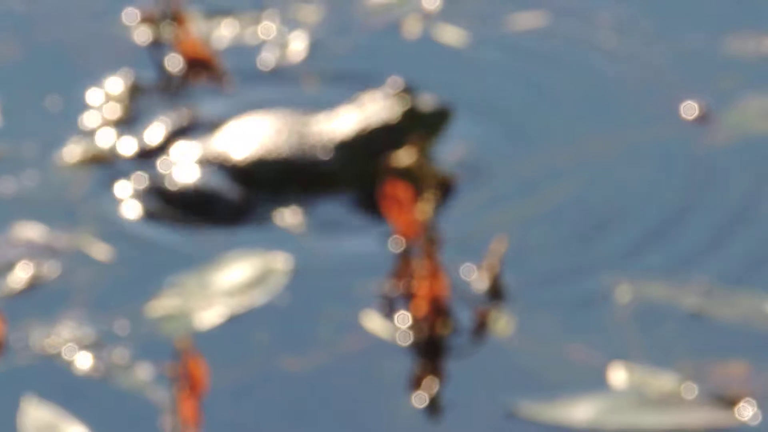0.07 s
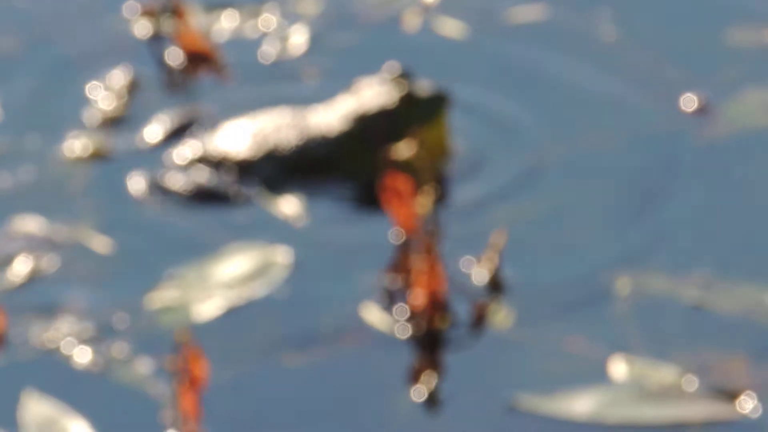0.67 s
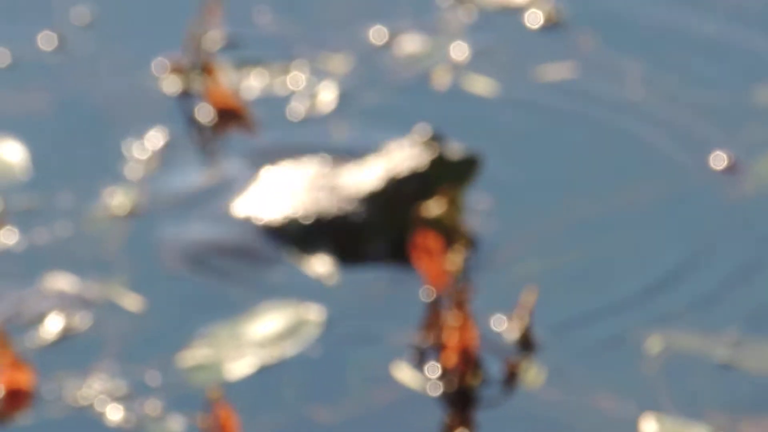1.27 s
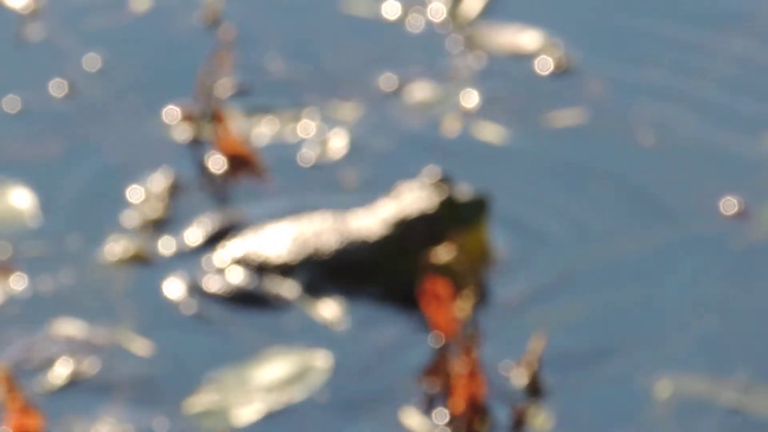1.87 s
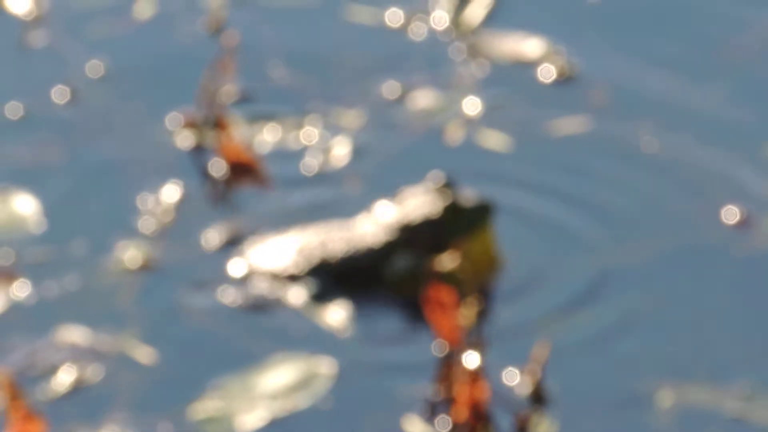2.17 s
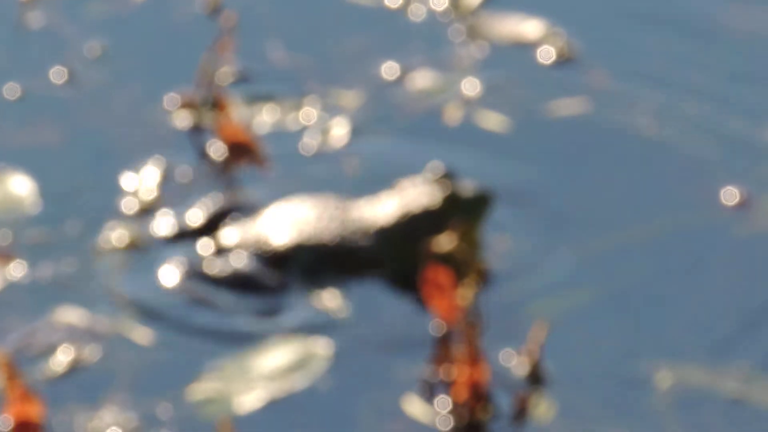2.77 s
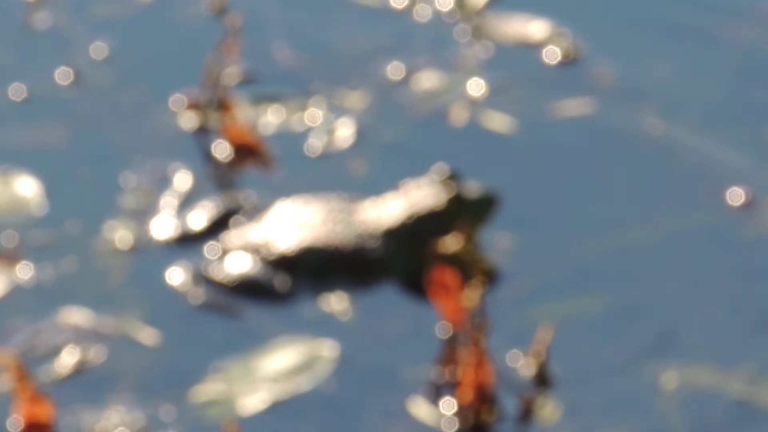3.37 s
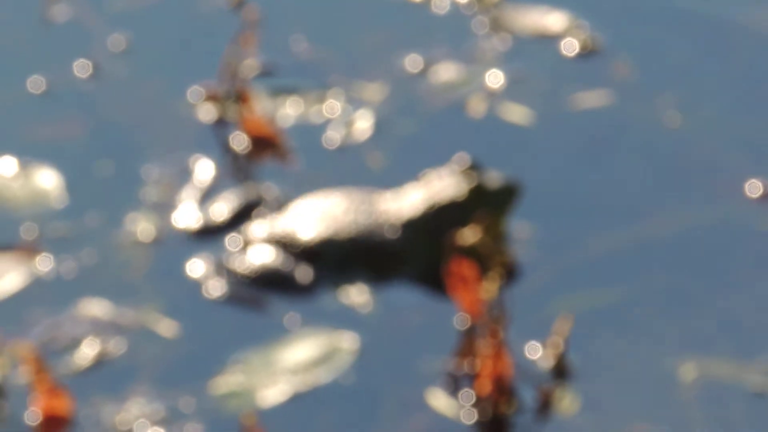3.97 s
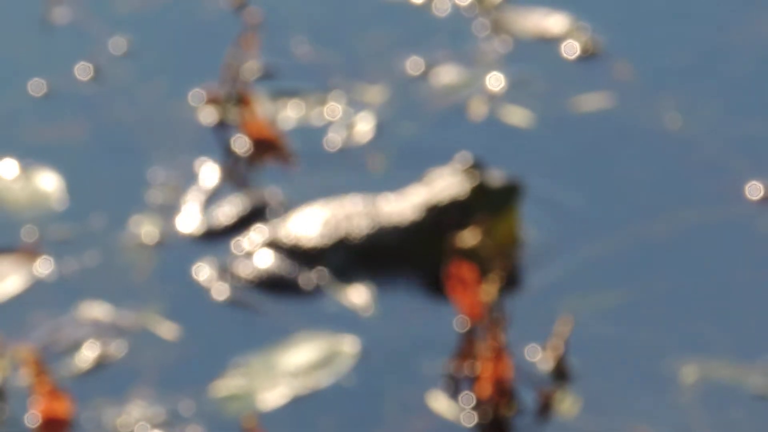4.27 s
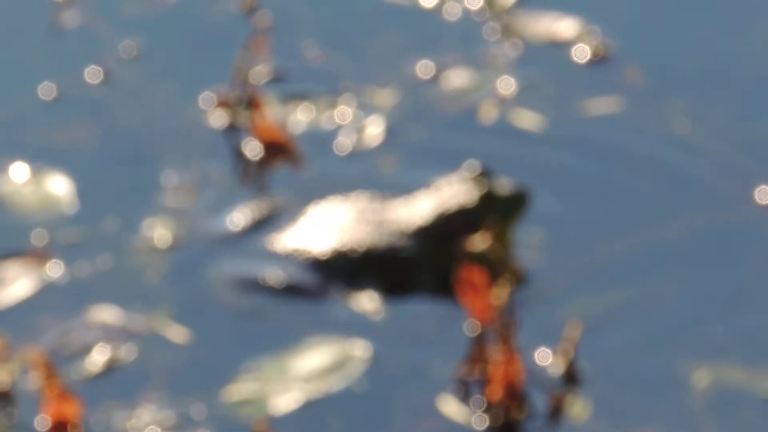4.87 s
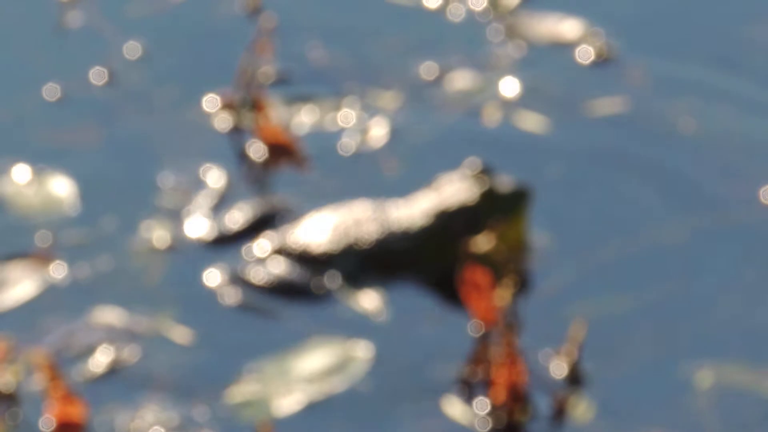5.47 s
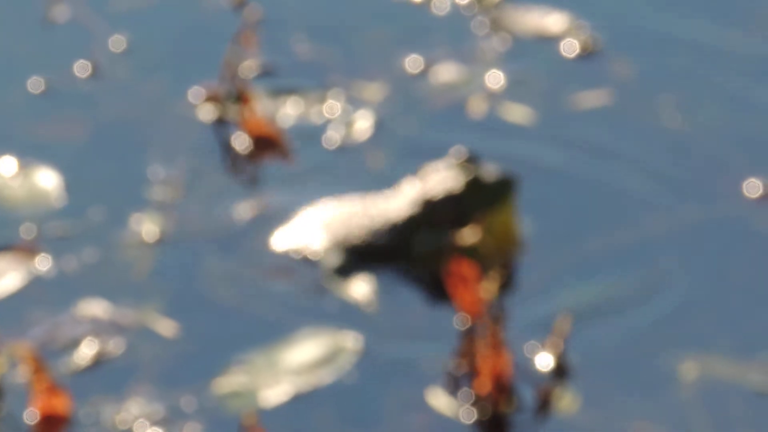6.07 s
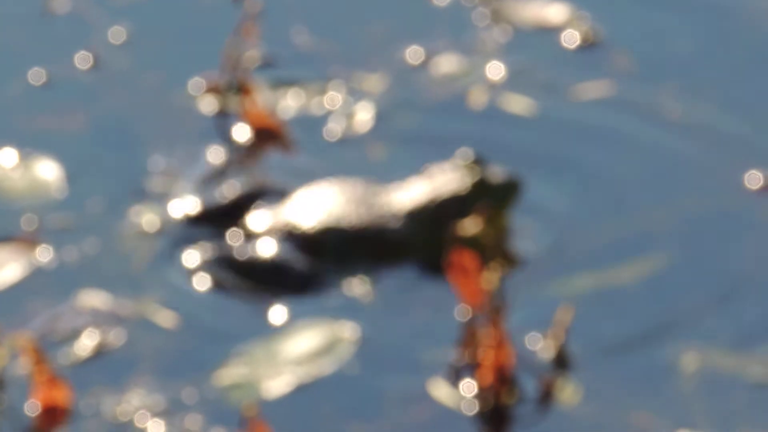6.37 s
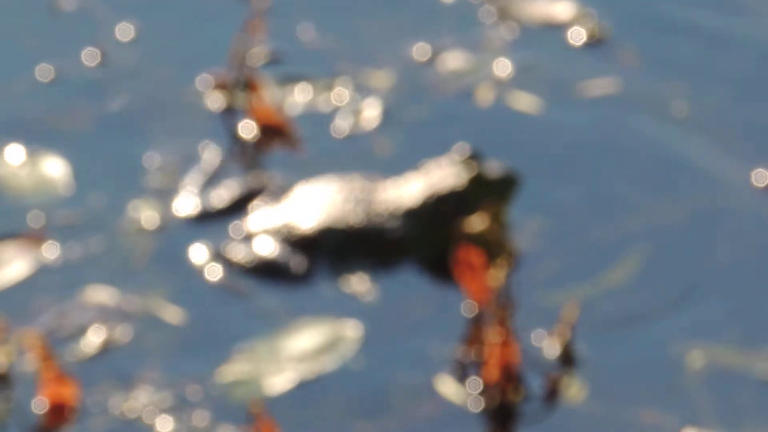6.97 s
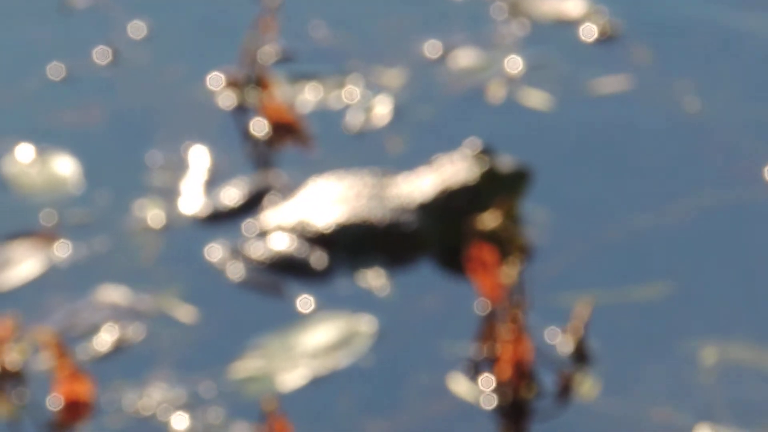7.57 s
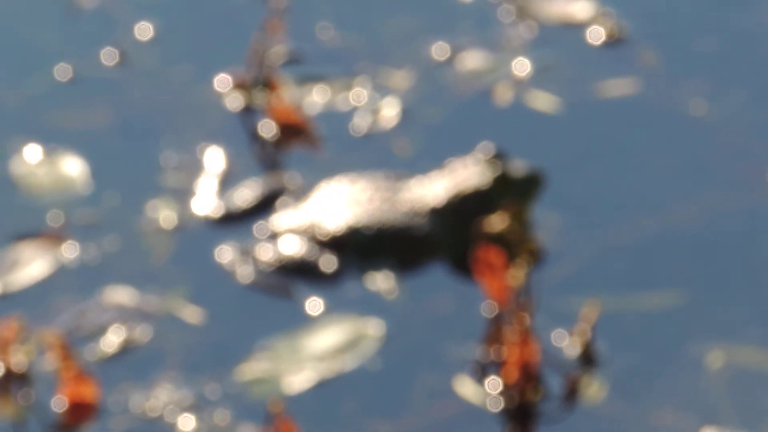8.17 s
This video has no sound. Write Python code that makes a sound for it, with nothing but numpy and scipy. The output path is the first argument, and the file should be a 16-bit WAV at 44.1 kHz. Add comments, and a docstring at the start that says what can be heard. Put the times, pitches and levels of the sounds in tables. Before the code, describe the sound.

A nearby bullfrog gives four low, pulsing, buzzy croaks over a distant drone of other frogs and a light breeze on the microphone.

```python
"""Far bullfrogs drone round a pond; a breeze rumbles on the microphone ports over a thin hiss.
At 0.3 s and 1.7 s a near bullfrog croaks: swells that each end in a catch, then a drawn-out drone.
Its vocal cords snap about 115 times a second, booming in the throat sac and buzzing through the
eardrums; the banks echo it. Eddies buffet the ports around 3 s. It croaks again at 4.2 s and 5.4 s,
then gusts pass and the far chorus surges."""
import sys
import numpy as np
from scipy import signal
from scipy.fft import rfft, irfft, next_fast_len
from scipy.io import wavfile
from scipy.ndimage import uniform_filter1d

SR = 44100
rng = np.random.default_rng(int(sys.argv[2]) if len(sys.argv) > 2 else 0)


def generate_wav(sig):
    """Save sig (samples, or channels by samples) to the path in sys.argv[1] as 16-bit PCM at SR."""
    pcm = np.round(np.clip(np.atleast_2d(sig).T, -1, 1) * 32767).astype(np.int16)
    wavfile.write(sys.argv[1], SR, pcm)


N = 363384
T = np.arange(N) / SR


# croaks: start_s, drone_end_s, top_pitch_hz, drone_buzz_db, full_sac_boom_db
CROAKS = [(.3, 1.153, 122.9, -29, -22.5), (1.67, 2.369, 121.9, -28.5, -22), (4.181, 4.75, 119.6, -27, -23),
          (5.35, 6.029, 119.1, -27.5, -22)]

def near_frog():
    """The frog in front, with short scatter from the reeds and a longer echo from the banks."""
    croaks = [croak_course(*row) for row in CROAKS]
    snaps, rebounds, push = sum(cords(croak, SWELLS) for croak in croaks)
    voice = sac_and_eardrums(snaps, rebounds, push, buzz_db=-1.73, boom_db=-1.5)
    voice = voice + sum(warble(croak) for croak in croaks)
    bright = signal.sosfilt(signal.butter(2, 600, "high", fs=SR, output="sos"), voice)
    reeds = undb(-7) * scatter(bright, t60_s=.12, wide_hz=1600)
    banks = undb(-18) * scatter(voice, t60_s=1.2, wide_hz=2800)
    return voice + rasp(snaps + rebounds) + reeds + banks + whistles()


# swells, each ended by a catch as the cords slam shut: catch_s, rest_s, crest_buzz_db, dip_db
SWELLS = [(.413, .013, -24.5, 19.5), (.555, 0.013, -25.5, 14.5), (.674, .013, -22.5, 11.5),
          (.805, .014, -24.5, 9.5), (.902, 0.014, -21.5, 10.5), (1.786, 0.013, -21.5, 13.5),
          (1.92, 0.012, -23, 10), (2.049, .012, -23, 9), (2.213, 0.011, -22.5, 4.5),
          (4.286, .011, -25, 11.5), (4.398, .013, -22, 12), (4.555, 0.0096, -23.5, 7),
          (5.443, 0.015, -23, 18.5), (5.584, .015, -21, 13.5), (5.724, .015, -23, 9.5),
          (5.886, 0.013, -24, 4.5)]
ONSET_DB, DIP_S, RECOVER_DB_PER_S = 31.5, .0316, 199
RELEASE_S, RELEASE_DB_PER_S = .085, 235
FILL_DB_PER_S, FULL_S, EMPTY_DB_PER_S, BOOM_SHARE = 12.5, .26, 74, .63
START_HZ, CLOSE_HZ, SLACK_HZ, GLIDE_S = 107.62, 112.05, 103.4, .125
REBOUND_BASE, REBOUND_PER_DB, REBOUND_CLOSE, CLOSE_S = .21, .07, .78, .15

def croak_course(start, end, top_hz, drone_db, full_db):
    """Effort builds, dips after each catch, lets go. Rows: time_s, pitch_hz, buzz_db, boom_db, rebound."""
    s = np.arange(start, end + RELEASE_S, .002)
    catches, _, crests, depths = np.transpose([row for row in SWELLS if start < row[0] < end])
    dips_db = sum(np.interp(s - at, [0, DIP_S, DIP_S + abs(depth) / RECOVER_DB_PER_S], [0, depth, 0])
                  for at, depth in zip(catches, depths))
    released_s = np.maximum(s - end, 0)
    slack_db = np.interp(s, [start, catches[0]], [ONSET_DB, 0]) + dips_db + RELEASE_DB_PER_S * released_s
    buzz_db = np.interp(s, [*catches, end], [*crests, drone_db]) - slack_db
    unfilled_db = FILL_DB_PER_S * np.maximum(end - FULL_S - s, 0)
    boom_db = full_db - unfilled_db - BOOM_SHARE * slack_db - EMPTY_DB_PER_S * released_s
    # pitch climbs as the sac fills, then falls ever faster
    climb_hz = np.interp(s, [start, end - GLIDE_S], [START_HZ, top_hz])
    fall_hz = (top_hz - CLOSE_HZ) * np.maximum((s - end) / GLIDE_S + 1, 0) ** 2
    pitch_hz = np.maximum(climb_hz - fall_hz, SLACK_HZ)
    closing = np.interp(s - end, [-CLOSE_S, 0, RELEASE_S / 2], [0, 1, 0])
    rebound = np.clip(REBOUND_BASE + REBOUND_PER_DB * dips_db + REBOUND_CLOSE * closing, 0, 1)
    return np.transpose([s, pitch_hz, buzz_db, boom_db, rebound])


def snap_times(croak, catches, jitter):
    """One snap of the cords a cycle; a catch cuts a cycle short and holds the next one back."""
    s, pitch_hz = croak.T[:2]
    ahead = [row for row in catches if s[0] < row[0] < s[-1]]
    times, t = [], s[0]
    for chance in rng.standard_normal(size=160):
        if t > s[-1]:
            break
        period_s = (1 + jitter * chance) / np.interp(t, s, pitch_hz)
        times.append(t)
        t += period_s
        if ahead and t + period_s / 2 > ahead[0][0]:
            catch_s, rest_s = ahead.pop(0)[:2]
            times.append(catch_s)
            t = catch_s + rest_s
    return np.array(times)


def looseness(t, croak):
    """1 in the rough swells, falling to 0 as the cords lock into the closing drone."""
    end_s = croak[-1, 0]
    return np.interp(t, [end_s - .22, end_s - .15], [1, 0])


def cords(croak, catches, jitter=.0088, sac_rebound=.58, catch_boom_db=1):
    """Pulse trains of one croak: snaps and rebounds on the eardrums, and the push on the sac."""
    t = snap_times(croak, catches, jitter)
    s, *columns = croak.T
    pitch_hz, buzz_db, boom_db, rebound = (np.interp(t, s, column) for column in columns)
    shimmer, wander, *stray = rng.standard_normal((len(t), 4)).T
    size = np.sqrt(SR / pitch_hz / (1 + 2 * rebound ** 2)) * undb(.4 * shimmer)
    caught = np.isin(t, [row[0] for row in catches])
    buzz = size * undb(buzz_db)
    boom = size * undb(boom_db + catch_boom_db * caught)
    rough = .5 + .5 * looseness(t, croak)
    t = t + rough * wander * .007 / pitch_hz
    # rebounds split the cycle in three and lift every third harmonic
    thirds = [t + (k + .04 * rough * stray[k - 1]) / 3 / pitch_hz for k in (1, 2)]
    rebounds = sum(clicks(at, buzz * rebound) for at in thirds)
    push = clicks(t, boom) + sum(clicks(at, boom * rebound * sac_rebound) for at in thirds)
    return np.array([clicks(t, buzz), rebounds, push])


# throat sac response: freq_hz, relative_db
SAC_RESPONSE = [(60, -11), (120, -31), (170, -21), (230, 9.5), (345, 2), (400, 2.5), (470, -10.5),
                (580, -37), (900, -49.5)]
# eardrum response: freq_hz, relative_db
EARDRUM_RESPONSE = [(400, -49), (570, -17.5), (690, -10), (820, -10), (1040, 1.5), (1300, 6), (1480, 2.5),
                    (1730, 6), (2100, -2.5), (2330, -17.5), (2600, -14), (2830, -15.5), (3250, -19.5),
                    (4000, -31), (4600, -49), (14000, -64)]

def sac_and_eardrums(snaps, rebounds, push, buzz_db, boom_db, ring_db=6.5, sac_delay_s=.0024):
    """The sac booms round each snap, the eardrums buzz; rebounds also ring the lowest eardrum mode."""
    drive = snaps + .91 * rebounds + undb(ring_db) * resonance(rebounds, hz=920, width_hz=200)
    # the membrane answers later near its resonances: each snap is a tiny falling chirp
    for hz, width_hz in ((1120, 420), (1700, 650), (1350, 900)):
        drive = drive - 2 * resonance(drive, hz, width_hz)
    sac = np.roll(colour(push, SAC_RESPONSE, causal=False), int(sac_delay_s * SR))
    return undb(buzz_db) * colour(drive, EARDRUM_RESPONSE) + undb(boom_db) * sac


def warble(croak, crest_hz=1094, sag_hz=105, sag_s=.04, climb_s=.06, crest_share=.38):
    """A second oscillation near the ninth harmonic sags after each catch and climbs to each crest."""
    s, _, buzz_db = croak.T[:3]
    catches = [row[0] for row in SWELLS if s[0] < row[0] < s[-1]]
    sag = np.clip((catches[0] - T) / climb_s, 0, 1)
    sag = sag + sum(np.interp(T - at, [0, sag_s, sag_s + climb_s], [0, 1, 0]) for at in catches)
    pitch_hz = crest_hz - sag_hz * sag + 25 * drift(rate_hz=150)
    # needs little effort: sounds before the buzz and holds through the troughs
    level_db = .6 * np.interp(T, s, buzz_db) - 17
    fade_in = np.clip((T - s[0]) / .06, 0, 1)
    envelope = undb(level_db) * (crest_share + sag) * looseness(T, croak) * fade_in
    return envelope * np.sqrt(2) * np.sin(2 * np.pi * np.cumsum(pitch_hz) / SR)


# air rasping through the cords: freq_hz, relative_db
RASP_SPECTRUM = [(900, -35), (1600, 21), (2100, 22.5), (2450, 18.5), (2650, 6.5), (2900, 17.5), (3200, 2),
                 (3800, 5.5), (4600, -6.5), (7000, -3), (14000, -37)]

def rasp(pulses, gain_db=-16, puff_s=.006, delay_s=.001):
    """A puff of air at every pulse; it scatters and reaches the two ports unalike."""
    puff = signal.windows.hann(int(puff_s * SR))
    gate = np.roll(signal.oaconvolve(pulses, puff / np.linalg.norm(puff), "same"), int(delay_s * SR))
    return undb(gain_db) * colour(gate * rng.standard_normal((2, N)), RASP_SPECTRUM)


# whistles at the height of a croak: start_s, length_s, start_hz, end_hz, level_db
WHISTLES = [(0.86, 0.28, 5480, 5180, -57.5), (2.12, .2, 5500, 5250, -55), (4.474, .25, 5560, 5130, -55),
            (5.74, .2, 5520, 5250, -64)]

def whistles():
    """Air squeezed past the cords gives a faint, falling, unsteady whistle."""
    out = 0
    for start_s, length_s, start_hz, end_hz, level_db in WHISTLES:
        progress = np.clip((T - start_s) / length_s, 0, 1)
        pitch_hz = start_hz + (end_hz - start_hz) * progress + 135 * drift(rate_hz=700)
        envelope = undb(level_db) * np.sqrt(np.abs(np.sin(np.pi * progress)))
        out = out + envelope * np.sin(2 * np.pi * np.cumsum(pitch_hz) / SR)
    return out


def scatter(x, t60_s, wide_hz):
    """Reeds, banks and trees return a dense, fading tail."""
    t = T[:2 * SR]
    tail = spread(*rng.standard_normal((2, len(t))), wide_hz) * undb(-60 * t / t60_s)
    return signal.fftconvolve(x[None], tail / np.linalg.norm(tail[0]), axes=1)[:, :N]


def far_frogs(count=24, level_db=-42.5):
    """Other bullfrogs round the pond, each on its own pitch, smeared into a drone."""
    trains = 0
    for k, (late, sharp) in enumerate(rng.uniform(-1, 1, (count, 2))):
        croak = croak_course(*CROAKS[k % len(CROAKS)])
        start_s = (k + late / 2) * N / SR / count
        croak[:, 0] += start_s - croak[0, 0]
        croak[:, 1] *= 1.005 + .015 * sharp  # detune
        trains = trains + cords(croak, catches=[], jitter=.00853)
    voices = sac_and_eardrums(*trains, buzz_db=-2.5, boom_db=0)
    drone = scatter(voices, t60_s=1.66, wide_hz=2920)
    return unit_rms(drone) * undb(level_db + surge_db())


# surges and one lull of the far chorus: centre_s, length_s, change_db
SURGES = [(1.354, 0.14, -6), (2.7, 0.22, 2.5), (3.42, 0.55, 4), (5.147, 1, 0.5), (6.404, 1, 3),
          (7.127, 0.59, 5), (7.592, 0.28, 1.5)]

def surge_db():
    """The far chorus rises and falls about its usual level."""
    return sum(change_db * bump(centre_s, length_s) for centre_s, length_s, change_db in SURGES)


# distant surroundings: freq_hz, relative_db
WASH_SPECTRUM = [(30, -9), (130, 2.5), (200, -2), (300, -3), (450, -8), (570, -12), (750, -7), (1000, -5),
                 (1400, -7), (1750, -13.5), (2150, -15.5), (2700, -22), (4000, -50.5), (14000, -70)]

def distant_wash(level_db=-39, surge_share=.48):
    """Wavering noise from all round the pond; it follows a share of each surge."""
    wash = colour(spread(*rng.standard_normal((2, N)), wide_hz=2350), WASH_SPECTRUM)
    waver_db = drift(rate_hz=5)
    return unit_rms(wash) * undb(level_db + surge_share * surge_db() + waver_db)


# phase between the ports: freq_hz, left_lead_rad
PORT_PHASE = [(100, 0), (1500, 0.1), (2300, -1), (2600, -3), (4000, -2), (5000, -1.5)]
# balance between the ports: freq_hz, left_minus_right_db
PORT_BALANCE = [(100, 0.5), (220, 4.5), (600, 4.5), (1200, 5.5), (1650, 4), (2080, 6.5), (2750, 1.5),
                (4000, 2)]

def from_pond(x):
    """Sound from the pond is louder at the left port, and the ports differ in phase."""
    size = next_fast_len(N + SR)
    left = undb(curve(PORT_BALANCE, size) / 2) * np.exp(1j * curve(PORT_PHASE, size) / 2)
    return irfft(rfft(x, size) * np.array([left, 1 / left]), size)[:, :N]


# turbulence on the ports: freq_hz, relative_db
RUMBLE_SPECTRUM = [(4, -33), (18, -9), (35, -1.5), (70, 0.5), (130, -6), (200, -9.5), (320, -17.5),
                   (600, -35), (1500, -62)]
# gusts: centre_s, length_s, level_db, pan
GUSTS = [(.12, 0.29, -34, 0.52), (2.202, 0.067, -24, 0.5), (2.502, 1, -33, 0.26), (3.057, 0.2, -28, 0.7),
         (3.37, 0.69, -32, 0.37), (4.49, 0.17, -34, .72), (4.68, 0.18, -40, 0.51),
         (5.352, 0.35, -35.5, .27), (6.023, 0.39, -33.8, 0.58), (6.534, 0.68, -33.5, 0.74),
         (6.903, 0.17, -32.5, 0.9)]

def breeze(calm_db=-43, calm_pan=.29):
    """Turbulence rumbles on each port separately and swells in gusts."""
    power = (undb(calm_db) * port_gains(calm_pan)) ** 2
    for centre_s, length_s, level_db, pan in GUSTS:
        power = power + (undb(level_db) * port_gains(pan) * bump(centre_s, length_s)) ** 2
    flutter_db = 2.5 * np.array([drift(rate_hz=22), drift(rate_hz=22)])
    rumble = unit_rms(colour(rng.standard_normal((2, N)), RUMBLE_SPECTRUM))
    return rumble * np.sqrt(2 * power) * undb(flutter_db)


# eddies: centre_s, length_s, level_db, corner_hz, pan
EDDIES = [(2.991, 0.0065, -25, 740, .046), (3.009, 0.032, -25.5, 880, .038),
          (3.011, .027, -22.5, 200, 0.29), (3.047, 0.11, -24.5, 160, .1), (3.094, 0.023, -34, 189, 0.12),
          (3.536, 0.023, -33, 250, 0.32), (6.574, 0.16, -29, 156, 1), (6.954, .019, -28, 98, .58)]

def eddies():
    """Eddies buffet the ports with short bursts of low noise."""
    out = 0
    for centre_s, length_s, level_db, corner_hz, pan in EDDIES:
        spectrum = [(corner_hz / 8, -14), (corner_hz / 2.5, 0), (corner_hz, -3.5),
                    (2.4 * corner_hz, -6.5), (3.8 * corner_hz, -34), (14000, -70)]
        eddy = unit_rms(colour(rng.standard_normal(N), spectrum))
        out = out + port_gains(pan) * eddy * undb(level_db) * bump(centre_s, length_s)
    return out


# wisps of air: centre_s, length_s, left_level_db
WISPS = [(2.9, 0.26, -46.5), (6.431, 0.019, -49), (7.29, 0.025, -49)]

def wisps(right_db=-9):
    """Short, high hisses and ticks of air, mostly at the left port."""
    air = unit_rms(colour(rng.standard_normal((2, N)), [(2000, -7), (5000, 0), (8000, 1), (14000, -3)]))
    envelope = sum(undb(level_db) * bump(centre_s, length_s) for centre_s, length_s, level_db in WISPS)
    return air * envelope * undb([[0], [right_db]])


# microphone hiss: freq_hz, relative_db
HISS_SPECTRUM = [(100, 15), (3000, 0.5), (4200, 0), (5400, -1), (7000, -2), (10000, -3.5), (14000, -7)]

def microphone_hiss(level_db=-50):
    """Steady thin noise, independent in each port."""
    return unit_rms(colour(rng.standard_normal((2, N)), HISS_SPECTRUM)) * undb(level_db)


def undb(db):
    """Decibels to gain."""
    return 10 ** (np.asarray(db) / 20)


def unit_rms(x):
    """Scale to rms 1."""
    return x / np.sqrt(np.mean(x ** 2))


def curve(points, size):
    """(freq_hz, value) points interpolated over log frequency onto FFT bins."""
    hz, values = np.transpose(points)
    return np.interp(np.log(np.arange(size // 2 + 1) * SR / size + 1), np.log(hz), values)


def colour(x, points, causal=True, size=8192):
    """Unit-energy filter through (freq_hz, relative_db); rings after a pulse if causal, else round it."""
    gain = undb(curve(points, size))
    if causal:
        cepstrum = irfft(np.log(gain)) * (1 + np.sign(size / 2 - np.arange(size)))
        response, centre = irfft(np.exp(rfft(cepstrum))), 0
    else:
        response, centre = np.roll(irfft(gain), size // 2), size // 2
    response = response / np.linalg.norm(response)
    return np.apply_along_axis(lambda row: signal.oaconvolve(row, response)[centre:centre + N], -1, x)


def resonance(x, hz, width_hz):
    """Band-pass, gain 1 at its centre."""
    return signal.lfilter(*signal.iirpeak(hz, hz / width_hz, fs=SR), x)


def drift(rate_hz):
    """Random steps, smoothed twice."""
    hold = int(SR / rate_hz)
    steps = np.repeat(rng.standard_normal(N // hold + 1), hold)
    return uniform_filter1d(uniform_filter1d(steps, hold), hold)[:N]


def clicks(times_s, sizes):
    """Pulses shared between two samples; times wrap round the scene."""
    at = times_s * SR % (N - 1)
    i = at.astype(int)
    return np.bincount(i, sizes * (1 - at + i), N) + np.bincount(i + 1, sizes * (at - i), N)


def bump(centre_s, length_s):
    """Gaussian rise and fall, peak 1."""
    return np.exp(-(2 * (T - centre_s) / length_s) ** 2)


def spread(mid, side, wide_hz):
    """Sound from all around: the two close ports hear the same bass but different treble."""
    side = signal.sosfilt(signal.butter(1, wide_hz, "high", fs=SR, output="sos"), side)
    return np.array([mid + side, mid - side])


def port_gains(pan):
    """Equal-power gains; pan 0 is left, 1 is right."""
    angle = pan * np.pi / 2
    return np.array([[np.cos(angle)], [np.sin(angle)]])


def scene():
    """Frogs and wash come from the pond; hiss and wind belong to each port."""
    pond = from_pond(near_frog() + far_frogs() + distant_wash())
    return pond + microphone_hiss() + breeze() + eddies() + wisps()


def record(dry, silent_s=.106, top_hz=14150):
    """A moment of silence at the start; a steep low-pass cuts the top."""
    return signal.sosfilt(signal.ellip(10, .2, 70, top_hz, fs=SR, output="sos"), dry * (T > silent_s))


dry = scene()
out = record(dry)
generate_wav(out)
```